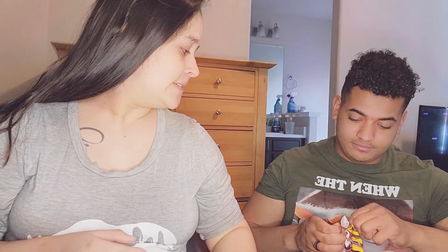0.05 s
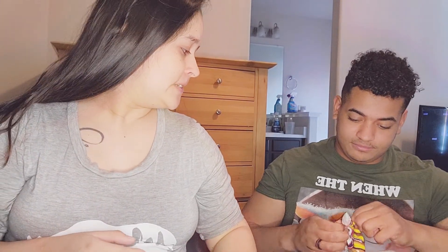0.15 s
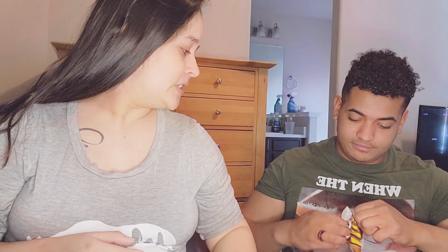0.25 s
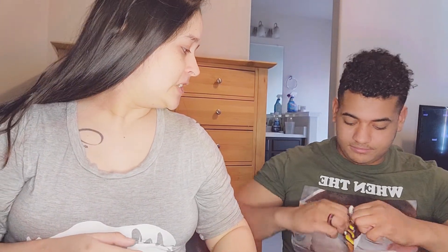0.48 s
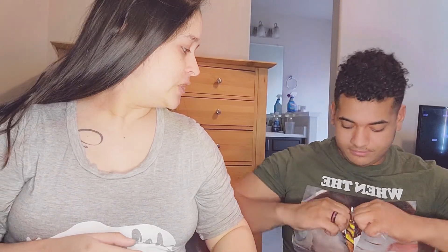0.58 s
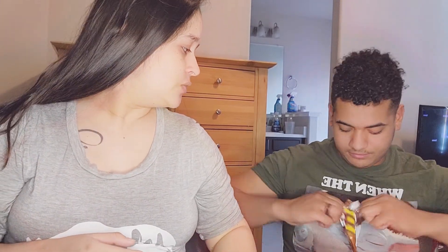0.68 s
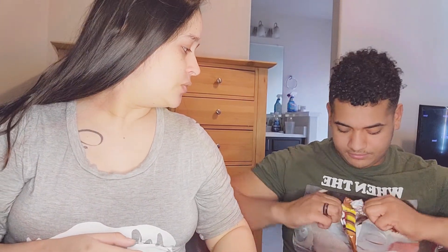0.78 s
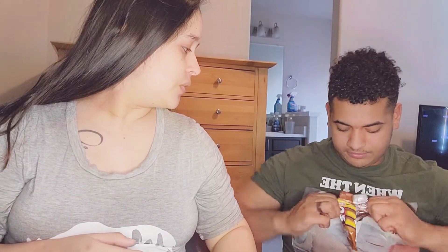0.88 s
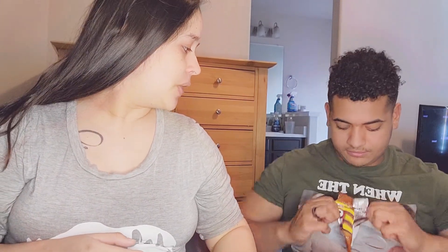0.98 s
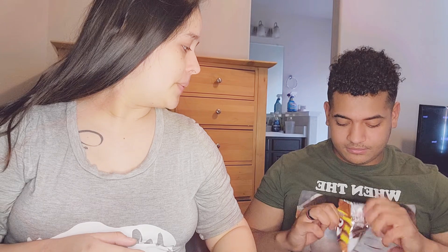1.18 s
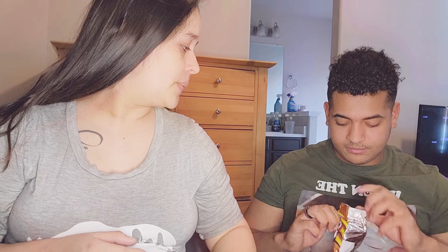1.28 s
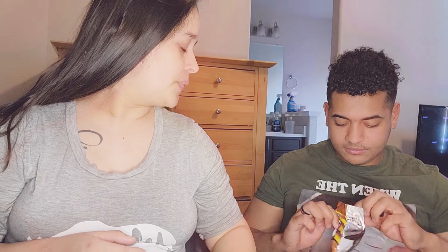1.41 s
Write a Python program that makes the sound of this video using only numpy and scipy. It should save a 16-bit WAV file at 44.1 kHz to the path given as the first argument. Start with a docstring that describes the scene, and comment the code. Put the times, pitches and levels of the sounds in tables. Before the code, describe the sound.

A small foil snack packet crinkles and snaps in two hands, then its seam pops open

```python
"""Plastic film, worked by two hands at a small snack packet, crinkles in swarms of tiny noise-burst buckles.
Single creases snap as clicks smeared by short resonances; damped sine knocks sound the pouch.
The seam gives way with one sharp pop that rings the pouch modes.
The packet lies a little way from the microphone in a furnished room: scattered echoes and a brief
diffuse tail follow each sound, and a low hum lies underneath with rumble and faint hiss."""
import sys
import numpy as np
from scipy import signal
from scipy.fft import rfft, irfft
from scipy.io import wavfile
from scipy.ndimage import uniform_filter1d

SR = 44100
rng = np.random.default_rng(int(sys.argv[2]) if len(sys.argv) > 2 else 0)


def unload_wav(signal):
    """Save mono or channel-first audio to the path in sys.argv[1] as 16-bit WAV at rate SR, clipped to [-1, 1]."""
    wavfile.write(
        sys.argv[1],
        SR,
        np.round(np.clip(np.atleast_2d(signal).T, -1, 1) * 32767).astype(np.int16),
    )


N = 63945
T = np.arange(N) / SR  # time axis, s

# Crinkling as the fingers grip, pull and unfold, before CRINKLE_DB:
# time_s, body_db, crack_db, sizzle_db
CRINKLE_LEVELS = [(0, -61, -52, -60.5), (.035, -79, -62, -72), (.145, -85, -68, -79),
                  (0.173, -54, -50, -65), (0.209, -65.5, -59, -61), (0.266, -58, -46.5, -53),
                  (.30, -64, -51.5, -62), (.36, -66.5, -59.5, -73), (0.429, -58.5, -53.5, -55),
                  (.48, -55.5, -40.5, -43.5), (0.514, -52.5, -43, -52), (.545, -50, -49, -46),
                  (0.594, -53, -39, -56.5), (0.62, -55.5, -47.5, -48.5), (.668, -39.5, -33, -33),
                  (0.718, -44.5, -38, -45), (.76, -59.5, -43.5, -51.5), (.80, -62, -50, -54.5),
                  (0.844, -55.5, -59.5, -63), (.88, -49.5, -42.5, -41), (.93, -58.5, -66, -63),
                  (.995, -61, -75, -67), (1.028, -53.5, -44, -53), (1.065, -64, -59, -55),
                  (1.109, -50, -41.5, -46.5), (1.16, -54.5, -63, -58.5), (1.20, -70.5, -64, -65.5),
                  (1.28, -64.5, -71, -69.5), (1.345, -77, -92, -97), (1.372, -55.5, -59, -59),
                  (1.40, -81, -62, -71), (1.45, -66, -65, -78)]
# Body, crack and sizzle bands of the crinkling: low_hz, high_hz
CRINKLE_BANDS = [(440, 1790), (1850, 5140), (5000, 20000)]
# Spectrum of a buckle in the film: frequency_hz, gain_db
FILM_SPECTRUM = [(150, -8), (300, -2), (420, -2.5), (600, -0.5), (780, 3), (1100, 1.5), (1600, 4.5),
                 (2400, -1), (3400, 6.5), (4600, 0.5), (6000, 2), (8000, 2), (9300, -5.5), (11200, -8),
                 (13000, -2.5), (15000, -5)]
BUCKLES_PER_S = 1600  # rate at the hardest pull
RATE_SHARE = 0.45  # share of the level's swing in dB that is passed to the buckle rate
BUCKLE_SPREAD_DB, BUCKLE_RING_S, CRINKLE_DB = 3.5, 0.00046, -2.0

# Low appliance hum: frequency_hz, level_db (rms)
HUM_TONES = [(59.5, -74), (97.5, -67), (119, -72)]
# Spectrum of the room's rumble and hiss: frequency_hz, gain_db
FLOOR_SPECTRUM = [(20, -59), (40, -40), (80, -43), (130, -44), (200, -52), (400, -62), (1000, -63.5),
                  (3000, -59.5), (8000, -76), (15000, -85)]
FLOOR_SIDE_DB = -11  # left-right difference against the shared part

# Snaps of single creases, before SNAP_DB and the snap spectrum:
# start_s, body_db, crack_db, sizzle_db
CREASE_SNAPS = [(0.048, -14, -5.5, -22), (0.0596, -29.5, -12, -32.5), (0.0904, -43, -22, -34.5),
                (.1235, -41, -29, -37), (.1500, -21.5, -22, -34), (0.1794, -20, -18, -23),
                (0.2185, -22, -14.5, -14), (.2251, -35, -24, -26), (.2477, -15, -10.5, -9.5),
                (0.2674, -4, -9.5, -33), (0.2945, -22.5, -26, -20.5), (0.3499, -30, -30, -30),
                (0.3738, -36, -33, -27), (0.3902, -41, -32, -18.5), (0.4029, -23, -22.5, -16.5),
                (0.4465, -24, -26, -18), (0.4531, -23, -24, -20), (0.4587, -43, -11.5, -13.5),
                (.4714, -29, -10.5, -12), (0.479, -32, -6.5, -8.5), (0.4915, -33, -9, -19),
                (0.4986, -10.5, -24, -18), (0.538, -8, -4.5, -9), (0.582, -31, -3.5, -16),
                (.5909, -22.5, -6, -18), (0.6425, -16, -9, -8.5), (0.6622, -21, -4, -7),
                (0.6713, -8.5, -5, -9), (0.7019, -1.5, -2, -5), (.7310, -5.5, -13, -37),
                (0.7506, -23, -8, -17.5), (.7830, -30, -23, -21), (0.817, -26, -21, -22.5),
                (0.8561, -25, -25, -16), (0.8681, -27, -19, -16), (.8702, -17, -26, -6.5),
                (0.8891, -1, -13, -27), (.9669, -9, -16, -37), (1.0043, -35, -12.5, -22.5),
                (1.0232, -13.5, -14.5, -18.5), (1.0609, -29, -24, -29.5), (1.0802, -17, -13.5, -14.5),
                (1.1059, -12.5, -12.5, -10), (1.1197, -7, -25, -11.5), (1.1594, -11, -16, -27),
                (1.1706, -23, -35, -16.5), (1.2250, -20, -33, -31), (1.2492, -23.5, -21, -40),
                (1.273, -19, -26.5, -24.5), (1.3306, -23, -41, -57), (1.3569, -18, -25, -49),
                (1.3630, -17, -16.5, -24), (1.3670, -14.5, -20, -28), (1.4230, -29.5, -24.5, -24.5)]
# Centres of body, crack and sizzle: frequency_hz
SNAP_CENTRES_HZ = (890, 3280, 7250)
# Spectrum common to all snaps: frequency_hz, gain_db
SNAP_SPECTRUM = [(100, -30), (280, -13.5), (500, -5.5), (1400, 2.5), (2100, -3), (3300, 3), (5000, 3),
                 (8000, -4), (11000, -9.5), (14500, -15.5)]
SNAP_RING_S, SNAP_DB = 0.0005, -2.0
FLUTTER_S, FLUTTER_DB = 0.0019, -2  # shiver of the film around a crease; level against the click

# Brief hollow knocks of the pouch by fingers and film: start_s, pitch_hz, level_db (peak before decay)
POUCH_KNOCKS = [(0.0486, 1492, -43.5), (0.2677, 373, -49), (.268, 1540, -41), (.377, 362, -46),
                (.404, 664, -49), (0.406, 1590, -43), (.467, 492, -49), (.668, 331, -46.5),
                (.695, 253, -49.5), (.722, 1066, -35), (.731, 1044, -33.5), (.967, 730, -47),
                (1.03, 437, -48.5), (1.098, 242, -51), (1.157, 460, -49), (1.3566, 555, -51),
                (1.364, 520, -46)]
KNOCK_DECAY_S = 0.0063  # amplitude falls by a factor e

# Spectrum of the seam's pop, before POP_DB: frequency_hz, gain_db
POP_SPECTRUM = [(100, -35), (280, -20), (480, 1.5), (720, 4), (950, 0), (1800, 4), (2300, 12), (2850, 12.5),
                (3500, 4.5), (4300, 7), (5800, 6), (7200, 0), (8200, 1), (10500, -9), (14000, -7)]
# Modes of the pouch rung by the pop: frequency_hz, level_db, t60_s
MODES = [(513, -43.5, 0.035), (612, -43, 0.059), (776, -35, 0.053), (1182, -38.5, 0.067)]
POP_S, POP_DB, POP_RING_S = 0.8969, -1.5, 0.00024

# Scattered reflections from nearby surfaces, before the echo spectrum: delay_s, smear_s, level_db
EARLY_ECHOES = [(.0033, 0.00088, -8), (.0085, .003, -11), (.0115, 0.0029, -10)]
# Spectrum of the reflections: frequency_hz, gain_db
ECHO_SPECTRUM = [(200, -1.5), (750, 4.5), (1500, 0), (2500, -2.5), (4000, 1.5), (8000, -0.5), (15000, 3)]
ECHO_SPLIT_HZ = 720  # the two sides share the echoes below, differ above

# Room tail: frequency_hz, level_db (against the sound sent to the room), t60_s,
# likeness (left-right correlation, no unit)
ROOM_TAIL = [(200, -4, 0.35, 0.78), (447, -3, 0.37, 0.88), (730, -2.5, 0.29, 0.39),
             (1430, -5.5, 0.22, 0.086), (2300, -4, 0.31, .02), (3160, -2.5, 0.28, 0.023),
             (5060, -5.5, 0.29, .02), (7960, -4.5, 0.26, 0.018), (15100, -4.5, .2, .02)]
ROOM_ONSET_S = 0.0071
# the pop faces the microphone, the crinkling spreads all round, the knocks reach the room weakly
POP_ROOM_DB, CRINKLE_ROOM_DB, KNOCK_ROOM_DB = -1.5, 1.5, -5.5

# Left side against right in the direct sound: frequency_hz, gain_db
LEFT_SPECTRUM = [(300, -0.5), (2000, -0.2), (4500, 3.5), (9000, 3), (15000, 4)]
LEFT_LAG_S = 0.00013
CUTOFF_HZ = 15750


def from_db(db):
    """Amplitude ratio: 20 decibels make a factor of ten."""
    return 10 ** (np.asarray(db) / 20)


def at_hz(points, hz):
    """Logarithmic interpolation: read a table on a log-frequency axis."""
    f, value = np.transpose(points)
    return np.interp(np.log(np.maximum(hz, 1)), np.log(f), value)


def convolve(x, response):
    """Linear superposition: each channel is convolved with a response."""
    return signal.fftconvolve(np.atleast_2d(x), np.atleast_2d(response), axes=1)[:, :N]


def colour(x, points, size=4096):
    """Minimum phase: a causal filter built from its spectrum by folding the cepstrum."""
    gain = from_db(at_hz(points, np.fft.rfftfreq(size, 1 / SR)))
    cepstrum = irfft(np.log(gain))
    cepstrum[1:size // 2] *= 2
    cepstrum[size // 2 + 1:] = 0
    response = irfft(np.exp(rfft(cepstrum)))
    return signal.fftconvolve(x, response)[:len(x)]


def band(x, low_hz, high_hz, order=2):
    """Band-pass filtering: a Butterworth response keeps one frequency range."""
    edges = [low_hz, min(high_hz, .45 * SR)]
    return signal.sosfilt(signal.butter(order, edges, "band", fs=SR, output="sos"), x)


def delay(x, s):
    """Phase shift: a delay by any fraction of a sample is a linear phase slope."""
    hz = np.fft.rfftfreq(2 * N, 1 / SR)
    return irfft(rfft(x, 2 * N) * np.exp(-2j * np.pi * hz * s))[:N]


def add(out, s, sound):
    """Superposition: mix a sound in at a time."""
    i = int(s * SR)
    out[i:i + len(sound)] += sound[:N - i]


def crinkle(size=600):
    """Random buckling: short bursts of uneven size, more of them the harder the pull."""
    s, *columns = np.transpose(CRINKLE_LEVELS)
    curves = np.array([np.interp(T, s, column) for column in columns])
    mean_db = curves.mean(axis=0)
    effort_db = mean_db - mean_db.max()
    born = rng.random(N) < BUCKLES_PER_S * from_db(RATE_SHARE * effort_db) / SR
    sizes = born * from_db(BUCKLE_SPREAD_DB * np.minimum(rng.exponential(1, N), 4))
    # each buckle adds energy that then dies away
    energy = signal.lfilter([1], [1, -np.exp(-2 / (BUCKLE_RING_S * SR))], sizes ** 2 + 1e-18)
    swarm = colour(np.sqrt(energy) * rng.standard_normal(N), FILM_SPECTRUM)
    out = 0
    for (low_hz, high_hz), level_db in zip(CRINKLE_BANDS, curves):
        part = band(swarm, low_hz, high_hz, order=3)
        power = uniform_filter1d(uniform_filter1d(part ** 2, size), size)
        # level the running power, then impose the band's own curve
        steady = part / np.sqrt(np.abs(power) + 1e-12)
        out = out + steady * from_db(level_db + CRINKLE_DB)
    return out


def background():
    """Stationary sound: steady hum tones over coloured noise, the rumble and faint hiss of the room."""
    mid, side = (colour(noise, FLOOR_SPECTRUM) for noise in rng.standard_normal((2, N)))
    hum = sum(from_db(db) * np.sqrt(2) * np.sin(2 * np.pi * (hz * T + rng.random())) for hz, db in HUM_TONES)
    return mid + hum + from_db(FLOOR_SIDE_DB) * side * np.array([[1], [-1]])


def crease(ring_s, count=8, size=2048):
    """Dispersion: all-pass resonances at random pitches smear a click, its spectrum staying flat."""
    x = signal.unit_impulse(size)
    radius = np.exp(-1 / (ring_s * SR))
    resonances_hz = 1000 + 14000 * (np.arange(count) + rng.random(count)) / count
    for hz in resonances_hz:
        a = [1, -2 * radius * np.cos(2 * np.pi * hz / SR), radius * radius]
        x = signal.lfilter(a[::-1], a, x)
    return x


def flutter(decay_s, size=2048):
    """Exponential decay: a burst of noise that dies away, of energy 1."""
    x = rng.standard_normal(size) * np.exp(-T[:size] / decay_s)
    return x / np.sqrt(np.sum(x ** 2))


def snaps():
    """Snap-through: each crease flips with its own spectral balance and shakes the film around it."""
    out = np.zeros(N)
    for s, *levels_db in CREASE_SNAPS:
        flip = crease(SNAP_RING_S) + from_db(FLUTTER_DB) * flutter(FLUTTER_S)
        add(out, s, colour(flip, list(zip(SNAP_CENTRES_HZ, levels_db))))
    return from_db(SNAP_DB) * colour(out, SNAP_SPECTRUM)


def knocks():
    """Damped oscillation: soft knocks set the pouch ringing, and the ring dies quickly."""
    out = np.zeros(N)
    for s, hz, db in POUCH_KNOCKS:
        add(out, s, from_db(db) * np.sin(2 * np.pi * hz * T) * np.exp(-T / KNOCK_DECAY_S))
    return out


def pop():
    """Impulsive release: the taut seam lets go at once and excites the modes of the pouch."""
    out = np.zeros(N)
    add(out, POP_S, from_db(POP_DB) * colour(crease(POP_RING_S), POP_SPECTRUM))
    for k, (hz, db, t60) in enumerate(MODES):
        sign = (-1) ** k  # neighbouring modes start in opposite directions
        decay = np.exp(-np.log(1000) * T / t60)
        add(out, POP_S, sign * from_db(db) * decay * np.cos(2 * np.pi * hz * T))
    return out


def echoes(x, size=4096):
    """Early scattering: smeared reflections, alike on both sides in the bass and different above."""
    response = np.zeros((2, size))
    for side in response:
        for s, smear_s, db in EARLY_ECHOES:
            add(side, s, from_db(db) * flutter(smear_s))
    shared = 1 / (1 + (np.fft.rfftfreq(2 * size, 1 / SR) / ECHO_SPLIT_HZ) ** 2)
    left, right = rfft(response, 2 * size)
    response[1] = irfft(shared * left + np.sqrt(1 - shared ** 2) * right)[:size]
    return convolve(x, [colour(side, ECHO_SPECTRUM) for side in response])


def room(x, count=12, size=16384):
    """Diffuse reverberation: noise decays band by band, alike on both sides only in the bass."""
    table, tail, t = np.array(ROOM_TAIL), 0, T[:size]
    edges = np.geomspace(120, 18000, count + 1)
    for low, high in zip(edges, edges[1:]):
        centre_hz = np.sqrt(low * high)
        db, t60, alike = (at_hz(table[:, [0, k]], centre_hz) for k in (1, 2, 3))
        alike = np.clip(alike, -1, 1)
        mid, side = band(rng.standard_normal((2, size)), low, high)
        part = np.sqrt(1 + alike) * mid + np.sqrt(1 - alike) * side * [[1], [-1]]
        part = part * np.exp(-np.log(1000) * t / t60) * np.minimum(t / ROOM_ONSET_S, 1) ** 2
        # energy in proportion to bandwidth, so that level_db holds in every band
        energy = np.mean(np.sum(part ** 2, axis=1))
        tail = tail + part * from_db(db) * np.sqrt((high - low) / SR * 2 / energy)
    return convolve(x, tail)


def surroundings(x, count=8):
    """Moving source: the pattern of reflections fades from one place's into the next."""
    place = T / T[-1] * (count - 1)
    out = 0
    for k in range(count):
        part = x * np.cos(np.pi / 2 * np.minimum(np.abs(place - k), 1))
        out = out + echoes(part) + room(part)
    return out


def scene():
    """Direct and reflected sound: the left side hears the packet a little later, then surfaces answer."""
    rustle, creases, bumps, seam = crinkle(), snaps(), knocks(), pop()
    packet = rustle + creases + bumps + seam
    spread = creases + from_db(CRINKLE_ROOM_DB) * rustle
    spread = spread + from_db(KNOCK_ROOM_DB) * bumps + from_db(POP_ROOM_DB) * seam
    left = colour(delay(packet, LEFT_LAG_S), LEFT_SPECTRUM)
    direct = np.array([left, packet])
    return direct + surroundings(spread) + background()


def record(dry):
    """Low-pass filtering: an elliptic response cuts the top steeply."""
    return signal.sosfilt(signal.ellip(10, .2, 80, CUTOFF_HZ, fs=SR, output="sos"), dry)


dry = scene()
out = record(dry)
unload_wav(out)
```